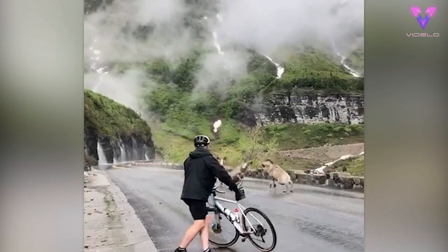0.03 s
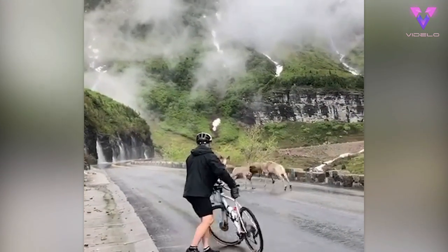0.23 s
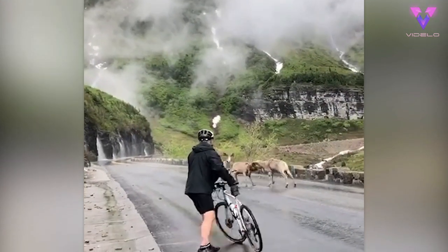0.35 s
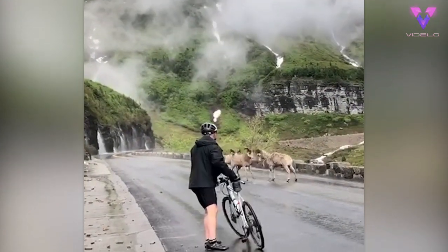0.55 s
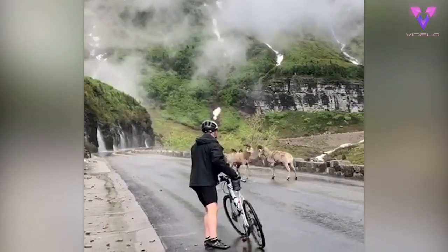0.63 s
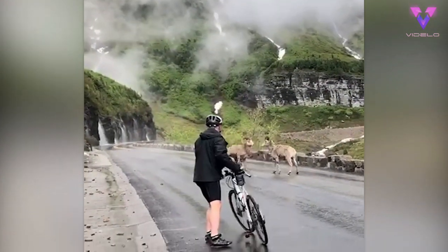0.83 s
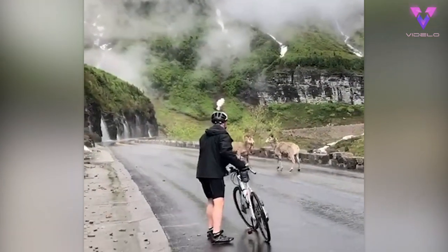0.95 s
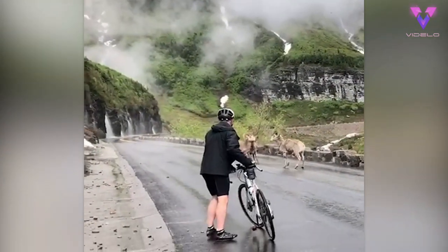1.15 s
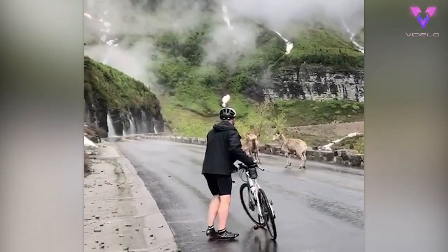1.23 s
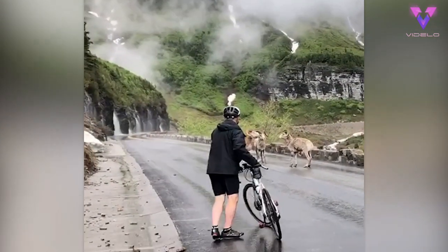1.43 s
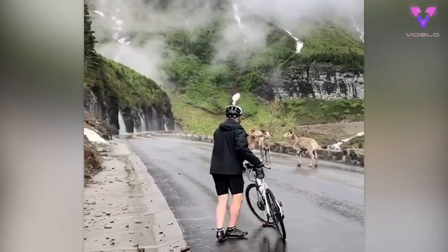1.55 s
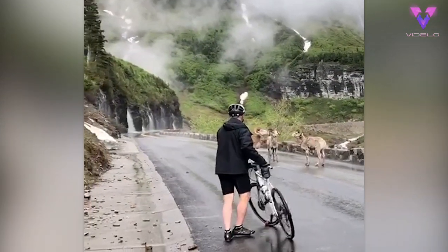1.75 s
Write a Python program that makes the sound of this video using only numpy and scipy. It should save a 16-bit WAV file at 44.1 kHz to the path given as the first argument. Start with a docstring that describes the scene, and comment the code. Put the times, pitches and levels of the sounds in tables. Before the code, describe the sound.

Two rams butt heads with one sharp, hollow crack over faint rushing water.

```python
"""Distant waterfalls rush steadily, and a moment later two wild rams butt heads on a wet mountain road.
Their horns meet three times within 30 ms: each time a hard click and crunch, then a hollow knock of
horn and skull. The bodies thud, and the road and rocks scatter the crack into a short echo.
A few faint hoof steps and tiny bright ticks follow while the water rushes on."""
import sys
import numpy as np
from scipy import signal
from scipy.fft import rfft, irfft
from scipy.io import wavfile
from scipy.ndimage import uniform_filter1d

SR = 44100
rng = np.random.default_rng(int(sys.argv[2]) if len(sys.argv) > 2 else 0)


def generate_wav(signal):
    """Clip the signal to [-1, 1] and save it as 16-bit WAV at the path in sys.argv[1]."""
    frames = np.transpose(np.atleast_2d(signal))
    scaled = np.clip(frames, -1, 1) * 32767
    pcm = np.round(scaled).astype(np.int16)
    wavfile.write(sys.argv[1], SR, pcm)


N = 79380

# A "fade" is the time a sound takes to drop by 60 dB. A "colour" sets only the balance of low and high.
# the horns meeting (time [s], click level [dB], click pitch [Hz], crunch level [dB], crunch fade [s],
# knock delay [s], knock level [dB], knock pitch [ratio], knock fade [ratio])
HORN_HITS = [(0.2319, -10, 2870, -19.5, 0.017, 0.0017, -2.5, 1.0, 0.95),
             (0.2520, -15, 3430, -22.5, 0.0092, 0.00047, -9.5, 1.0, 0.64),
             (0.259, -27.5, 8130, -29, 0.055, 0.0015, -2, 1.13, 0.47)]
# ringing tones of horn and skull, which each hit scales (pitch [Hz], level [dB], fade [s])
HORN_TONES = [(210, -23, 0.14), (312, -24.5, 0.18), (530, -40, 0.039), (639, -1, 0.035),
              (855, -14.5, 0.042), (1048, -20.5, 0.052), (1270, -20.5, 0.036), (1444, -25, 0.057),
              (1947, -24, 0.022), (2420, -28.5, 0.0072), (2784, -27.5, 0.038), (3470, -31.5, 0.033)]
# crunch of the horn ridges (frequency [Hz], level [dB])
CRUNCH_COLOUR = [(300, -14), (1200, 4), (2100, 0), (2900, 4.5), (4200, 1), (6000, -8), (8000, -14.5),
                 (12000, -21), (16000, -30)]
# echo from road, wall and rocks (frequency [Hz], level [dB])
ECHO_COLOUR = [(60, -13), (150, -7), (230, -8), (420, -4), (620, 4.5), (850, -0.5), (1200, -8.5),
               (2200, -20), (3300, -21.5), (5500, -29.5), (9000, -37.5), (16000, -48)]
# low tones of the bodies (pitch [Hz], level [dB], fade [s])
BODY_TONES = [(59.5, -33, 0.26), (92, -31, 0.19), (114.5, -31.5, 0.16), (204.2, -29, 0.17)]
# hooves landing (time [s], tick level [dB], thump level [dB])
HOOF_STEPS = [(0.3587, -31.5, -37.5), (0.4, -67, -43), (0.769, -46, -46.5)]
# sharp and dull parts of a step (frequency [Hz], level [dB])
HOOF_TICK_COLOUR = [(200, 5.5), (1200, 3.5), (2500, -2), (4000, -10.5), (15000, -40)]
HOOF_THUMP_COLOUR = [(60, -18), (260, 3.5), (520, 0.5), (900, -4), (2000, -24), (8000, -55)]
# faint high ticks (time [s], level [dB])
TINY_TICKS = [(0.783, -60), (0.82, -57), (1.521, -55.5)]
# brightness of those ticks (frequency [Hz], level [dB])
TINY_TICK_COLOUR = [(1000, -3), (6000, 2), (13000, -6), (16000, -8)]
# rush of the waterfalls (frequency [Hz], level [dB])
WATER_COLOUR = [(15, -60), (25, -30), (59, -5.5), (107, -1.5), (136, -3), (204, -1), (281, -3), (410, -5.5),
                (457, -6), (970, -1), (1750, -6.5), (2010, -7), (3090, -11), (5140, -14.5), (15500, -37)]
# slow rise and fall of that rush (time [s], level [dB])
WATER_LOUDNESS = [(0, -48), (0.6, -50), (1.3, -49), (1.8, -50)]


def horns():
    """Each hit clicks and crunches at the surface, then the hollow horn and skull ring with a knock."""
    out = 0
    for start, click_db, click_hz, crunch_db, crunch_fade, delay, knock_db, pitch, stretch in HORN_HITS:
        click = ring(start, [(click_hz, click_db, 0.0035)], rise_s=0.00075)
        crunch = gain(crunch_db) * pulse(start, rise_s=0.0004, fade_s=crunch_fade) * noise(CRUNCH_COLOUR)
        knock = gain(knock_db) * ring(start + delay, HORN_TONES, rise_s=0.0016, pitch=pitch, stretch=stretch)
        out += click + crunch + knock
    return out


def roadside_echo():
    """Each knock bounces off road and rocks; the highs die first and the hillside answers faintly."""
    out, rise_s = 0, 0.0036
    for start, *_, delay, knock_db, _, _ in HORN_HITS:
        knock_time = start + delay
        wash = noise(ECHO_COLOUR)
        lows = below(wash, hz=2100)
        rocks = lows * pulse(knock_time, rise_s, fade_s=0.19)
        rocks += (wash - lows) * pulse(knock_time, rise_s, fade_s=0.17)
        hillside = noise(ECHO_COLOUR) * pulse(knock_time, rise_s, fade_s=0.55)
        out += gain(knock_db) * (gain(-20) * rocks + gain(-47) * hillside)
    return out


def body_thud():
    """The weight of the animals arrives just after the horns first touch."""
    return ring(start=0.243, tones=BODY_TONES, rise_s=0.007)


def hooves():
    """Each hoof lands on the road with a sharp tick and a dull thump."""
    out = 0
    for start, tick_db, thump_db in HOOF_STEPS:
        tick = pulse(start, rise_s=0.00075, fade_s=0.0083) * noise(HOOF_TICK_COLOUR)
        thump = pulse(start, rise_s=0.0032, fade_s=0.063) * noise(HOOF_THUMP_COLOUR)
        out += gain(tick_db) * tick + gain(thump_db) * thump
    return out


def tiny_ticks():
    """Very short, bright bursts of noise close by, perhaps drips or grit."""
    bursts = sum(gain(db) * pulse(start, rise_s=0.0004, fade_s=0.012) for start, db in TINY_TICKS)
    return bursts * noise(TINY_TICK_COLOUR)


def waterfalls():
    """Far-off falling water makes a nearly even rush whose octaves each flicker a little."""
    rest, rush, flicker_db = noise(WATER_COLOUR), 0, 0.93
    for hz in 125 * 2 ** np.arange(7):
        band = below(rest, hz)
        rest = rest - band
        rush += band * gain(flicker_db * drift(changes_per_s=14.04))
    level_db = np.interp(since(0), *np.transpose(WATER_LOUDNESS))
    return gain(level_db) * (rush + rest)


def gain(db):
    """Turn decibels into a number to multiply by."""
    return 10 ** (np.asarray(db) / 20)


def since(start):
    """Seconds since the start, zero before it."""
    return np.maximum(np.arange(N) / SR - start, 0)


def pulse(start, rise_s, fade_s):
    """The loudness of something struck: a smooth rise, then a fade."""
    rise = np.sin(np.pi / 2 * np.minimum(since(start) / rise_s, 1)) ** 2
    return rise * np.exp(-np.log(1000) * since(start + rise_s) / fade_s)


def ring(start, tones, rise_s, pitch=1, stretch=1):
    """One push sets off fading tones, each given as (pitch [Hz], level [dB], fade [s])."""
    return sum(gain(db) * pulse(start, rise_s, fade * stretch) * np.sin(2 * np.pi * hz * pitch * since(start))
               for hz, db, fade in tones)


def noise(colour):
    """Noise of strength 1 with the given balance of low and high."""
    hz, db = np.array(colour, float).T
    freqs = np.maximum(np.fft.rfftfreq(N, 1 / SR), 1)
    shape = gain(np.interp(np.log(freqs), np.log(hz), db))
    shape *= np.minimum(freqs / hz[0], 1) ** 2  # falls away below the first row
    x = irfft(shape * np.exp(2j * np.pi * rng.random(len(freqs))), N)
    return x / x.std()


def below(x, hz):
    """The part of a steady sound below a frequency."""
    return irfft(rfft(x) / (1 + (np.fft.rfftfreq(N, 1 / SR) / hz) ** 8), N)


def drift(changes_per_s):
    """A smooth random wobble of typical size 1."""
    hold = int(SR / changes_per_s)
    jumps = np.repeat(rng.standard_normal(N // hold + 1), hold)
    x = uniform_filter1d(uniform_filter1d(jumps, hold), hold)[:N]
    return (x - x.mean()) / x.std()


def scene():
    """The clash, its echo and the steps over the water, in one channel."""
    return (waterfalls() + horns() + roadside_echo() + body_thud() + hooves() + tiny_ticks())[None]


def record(dry):
    """The very highest sounds are cut away."""
    top_hz = 15800
    return signal.sosfilt(signal.ellip(10, .2, 80, top_hz, fs=SR, output="sos"), dry)


dry = scene()
out = record(dry)
generate_wav(out)
```